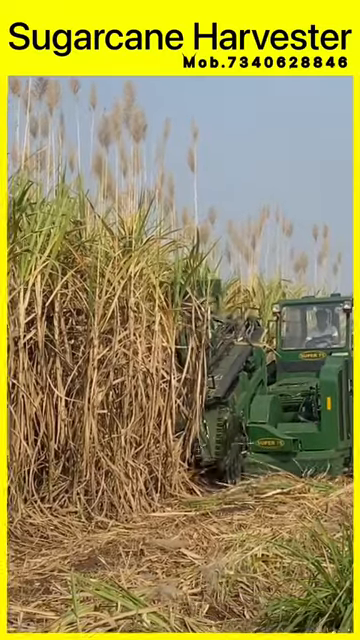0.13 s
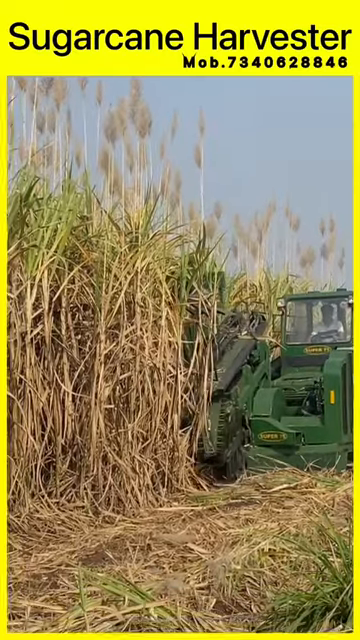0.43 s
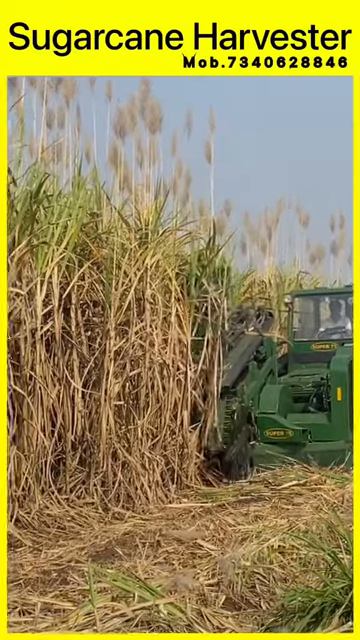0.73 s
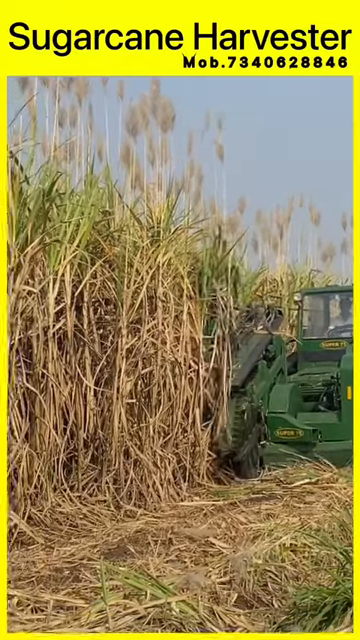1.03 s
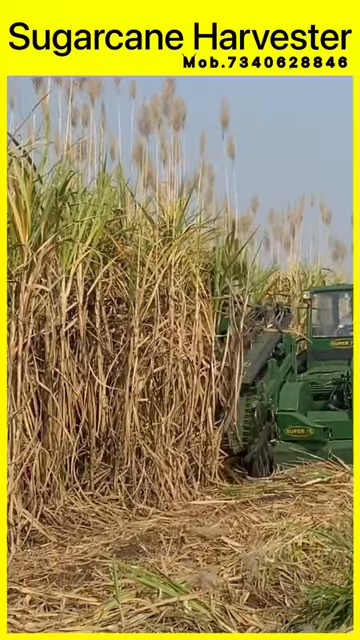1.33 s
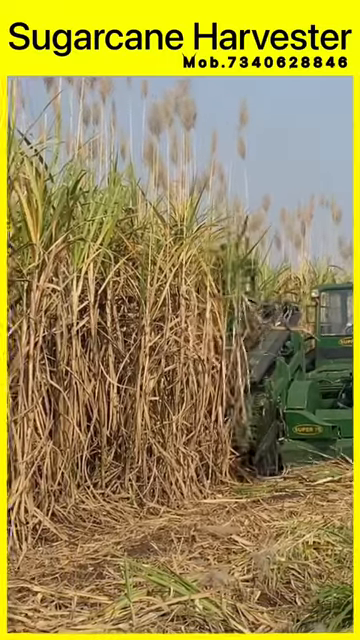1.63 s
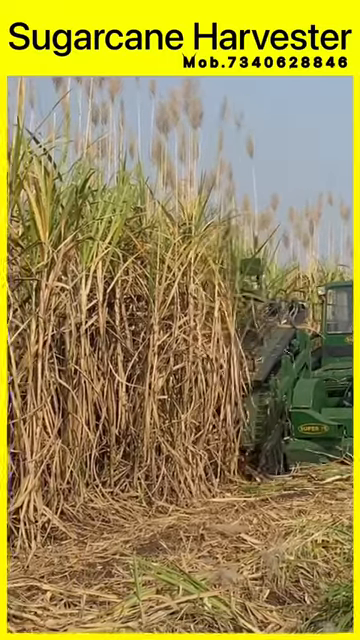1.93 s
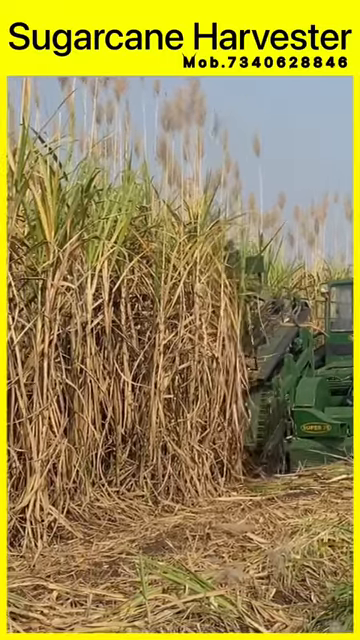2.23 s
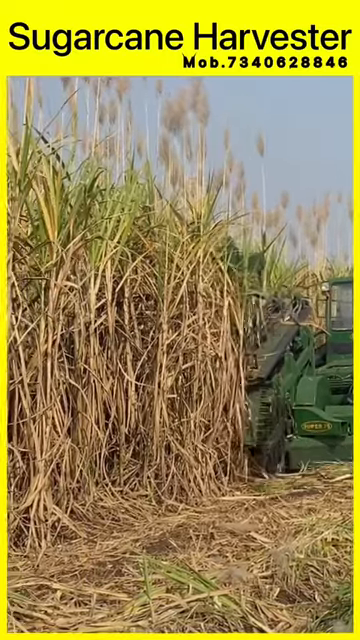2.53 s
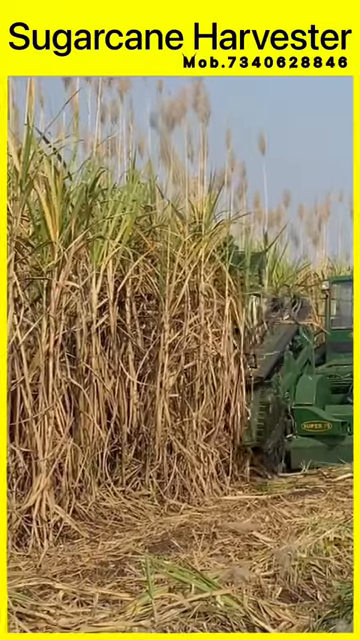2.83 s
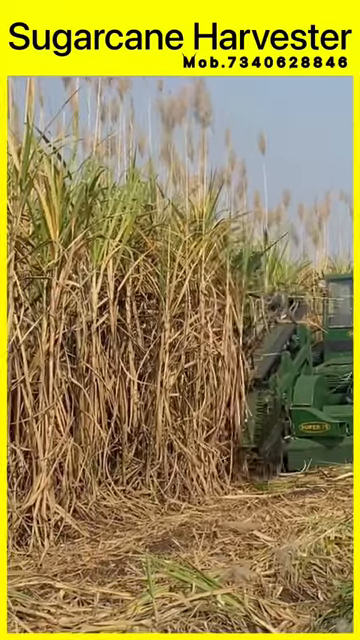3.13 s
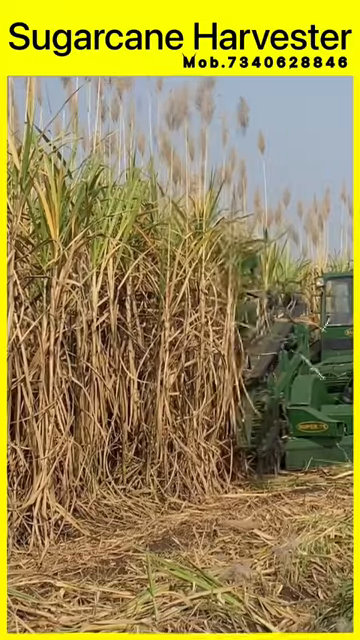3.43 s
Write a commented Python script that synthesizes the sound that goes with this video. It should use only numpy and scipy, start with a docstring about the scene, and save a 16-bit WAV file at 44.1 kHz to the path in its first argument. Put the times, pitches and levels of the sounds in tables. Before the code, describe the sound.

A diesel harvester roars steadily at mid distance while dry cane leaves rustle, crackle and snap.

```python
"""A six-cylinder diesel hums at its firing rate and other orders of its cycle: a crop harvester,
some way off in tall dry cane, heard outdoors through a phone's two microphone ports.
Sine tones make the engine, the hum an octave up and the whining shafts; shaped noise makes the
roar of fans and cutters, its hollow howl, and the low rumble that comes and goes.
Dry leaves and stalks are noise cut into crackles, snaps and ticks; brief tones slide up as squeaks."""
import sys
import numpy as np
from scipy import signal
from scipy.fft import rfft, irfft, next_fast_len
from scipy.io import wavfile
from scipy.ndimage import uniform_filter1d

SR = 44100
rng = np.random.default_rng(int(sys.argv[2]) if len(sys.argv) > 2 else 0)


def bounce(signal):
    """Save signal as a 16-bit WAV file at the path given by the first command-line argument."""
    frames = np.transpose(np.atleast_2d(signal))
    limited = np.clip(frames, -1, 1)
    pcm = np.round(limited * 32767).astype(np.int16)
    wavfile.write(sys.argv[1], SR, pcm)


def volts_from_db(level):
    """Convert decibel levels to linear amplitude ratios."""
    exponent = np.asarray(level, float) / 20
    return 10 ** exponent


N = 157437  # length in samples
STEP, SNAP_SAMPLES, FRAME = 256, 8192, 2048  # samples: control step, longest snap, port filter frame


def evened(x):
    """Scales to rms 1."""
    return x / np.sqrt(np.mean(x ** 2) + 1e-20)


def read(points, hz):
    """Reads a two-column table at the given frequencies, on a log-frequency axis."""
    f, value = np.transpose(points)
    return np.interp(np.log(hz + 1), np.log(f + 1), value)


def curve(rows, axis=1):
    """One column of a time table, drawn as straight lines through every sample."""
    rows = np.array(rows)
    return np.interp(np.arange(N) / SR, rows[:, 0], rows[:, axis])


def slow(top_hz):
    """Slow wander of rms 1: sines from 0.4 Hz to top_hz with random phases, the slower ones larger."""
    t = np.arange(0, N + STEP, STEP) / SR
    rates = np.geomspace(.4, top_hz, num=20)
    x = sum(np.sin(2 * np.pi * (f * t + rng.random())) / np.sqrt(f) for f in rates)
    return np.interp(np.arange(N) / SR, t, evened(x - x.mean()))


def sine(hz, start=0):
    """Sine of rms 1 that follows a frequency curve; start is in turns."""
    return np.sqrt(2) * np.sin(2 * np.pi * (np.cumsum(hz) / SR + start))


def coloured(x, spectrum):
    """Filters by a spectrum table."""
    size = next_fast_len(len(x))
    gain = volts_from_db(read(spectrum, np.fft.rfftfreq(size, 1 / SR)))
    return irfft(rfft(x, size) * gain, size)[:len(x)]


def noise(spectrum, patchy_db, flicker_db, size=512):
    """Noise of rms 1 with drifting patches and a flicker shared by all bands."""
    frames = 4 * N // size + 5
    real, imaginary, patches = rng.standard_normal((frames, size // 2 + 1, 3)).T
    patches = uniform_filter1d(patches, size=6, axis=0)  # across frequency
    patches = evened(uniform_filter1d(patches, size=16, axis=1))  # along time
    flicker = evened(uniform_filter1d(rng.standard_normal(frames), size=8))
    z = (real + 1j * imaginary) * volts_from_db(patchy_db * patches + flicker_db * flicker)
    hiss = signal.istft(z, nperseg=size, noverlap=3 * size // 4)[1][:N]
    return evened(coloured(hiss, spectrum))


# firing tone of the diesel: time_s, firing_hz, level_db
ENGINE_FIRING = [(0, 84.55, -40), (.3, 84.3, -38.5), (.55, 83.67, -34.5), (1.1, 84, -36.5), (1.5, 84, -36),
                 (1.85, 83.67, -33), (2.25, 83.7, -34.5), (2.7, 83.4, -32), (3.1, 83.73, -33.5),
                 (3.35, 84, -38), (3.57, 84.3, -34)]


def firings():
    """Running count of firings: the firing rate summed over time."""
    return np.cumsum(curve(ENGINE_FIRING)) / SR


# other orders of the engine cycle: order (multiple of the cycle rate), level_db, waver_db
CYCLE_ORDERS = [(3, -44, 0), (7, -68, 11), (8, -60.5, -6), (9, -41.5, 0.3), (10, -54, -1), (18, -57, 2.5)]
CYLINDERS, OPPOSED_ORDER = 6, 9


def engine():
    """Orders of the cycle; multiples of half the firing rate stay in step, so firings alternate."""
    out = volts_from_db(curve(ENGINE_FIRING, axis=2)) * np.sin(2 * np.pi * firings())
    for order, db, waver_db in CYCLE_ORDERS:
        turns = order * firings() / CYLINDERS
        turns += rng.random() * (2 * order % CYLINDERS > 0)  # the remaining orders start anywhere
        turns += .5 * (order == OPPOSED_ORDER)
        out = out + volts_from_db(db + waver_db * slow(3.63)) * np.sin(2 * np.pi * turns)
    return np.sqrt(2) * out


# hum about an octave above the firing tone, swelling and fading: time_s, pitch_hz, level_db
HUM_PATH = [(0, 170, -65), (.15, 167.4, -60), (.27, 165.7, -45), (.5, 166.4, -40.5), (.68, 169.3, -45),
            (.8, 165.5, -54), (1.0, 165.9, -44.5), (1.22, 166.7, -39), (1.4, 166, -57),
            (1.65, 166.7, -43.5), (1.95, 167.2, -40), (2.2, 165, -50), (2.42, 166.2, -43),
            (2.65, 167.2, -46.5), (2.9, 166.8, -42), (3.12, 166.3, -49.5), (3.35, 168.3, -42.5),
            (3.57, 168, -53)]


def octave_hum():
    """A clean tone on its own pitch and level curve."""
    return volts_from_db(curve(HUM_PATH, axis=2)) * sine(curve(HUM_PATH))


# shaft and pump tones: pitch_hz, level_db, drift_hz, waver_db
SHAFT_TONES = [(159.7, -53.5, 1.3, 1.5), (187.1, -55.5, 0.39, 1), (210.3, -59, 1.1, 2),
               (266.4, -60.5, 1.02, 2.5), (320.3, -55, 0.83, 1), (358.6, -69, 0.77, 6.5)]


def shafts():
    """Faint sine tones that drift in pitch and level."""
    out = np.zeros(N)
    for hz, db, drift_hz, waver_db in SHAFT_TONES:
        level = volts_from_db(db + waver_db * slow(3.1))
        out += level * sine(hz + drift_hz * slow(1.903), rng.random())
    return out


# colour of the fans, cutters and casing: pitch_hz, density_db (relative, per Hz)
ROAR_COLOUR = [(25, -22), (36, -4), (52, 0), (72, 0), (100, -2), (190, -1.5), (300, -9), (440, -10),
               (600, -6.5), (690, -4), (760, -6.5), (940, -8.5), (1200, -7.5), (1400, -11), (1600, -9.5),
               (1900, -13), (2150, -12), (2320, -17), (2480, -23), (2700, -19), (3600, -21.5), (4600, -28),
               (7000, -30), (15700, -40), (15850, -100)]
# their loudness: time_s, level_db
ROAR_LOUDNESS = [(0, -37), (.3, -37.5), (.7, -37.5), (1.1, -37), (1.35, -38), (1.8, -36.5), (2.3, -37),
                 (2.7, -36), (3.1, -36.5), (3.57, -36)]
ROAR_PATCHY_DB, ROAR_FLICKER_DB, FIRING_THROB = 0.89, 0.15, 0.03  # throb is a share of amplitude


def roar():
    """Broad noise, throbbing slightly with each firing."""
    throb = 1 + FIRING_THROB * np.cos(2 * np.pi * firings())
    return volts_from_db(curve(ROAR_LOUDNESS)) * throb * noise(ROAR_COLOUR, ROAR_PATCHY_DB, ROAR_FLICKER_DB)


HOWL_HZ, HOWL_WANDER_HZ, HOWL_WIDTH_HZ = 693.4, 30.04, 68
HOWL_DB, HOWL_WAVER_DB = -55, 2


def howl():
    """Hollow howl in the roar: noise in a resonance whose centre wanders."""
    centre = np.exp(2j * np.pi * np.cumsum(HOWL_HZ + HOWL_WANDER_HZ * slow(5)) / SR)
    r = np.exp(-np.pi * HOWL_WIDTH_HZ / SR)
    real, imaginary = rng.standard_normal((2, N))
    # narrow noise about 0 Hz, from a doubled pole, is then moved up to the centre
    band = signal.lfilter([1], np.convolve([1, -r], [1, -r]), real + 1j * imaginary)
    return volts_from_db(HOWL_DB + HOWL_WAVER_DB * slow(6)) * evened((centre * band).real)


# colour of the dry leaves: pitch_hz, density_db (relative, per Hz)
LEAF_COLOUR = [(600, -28), (1500, -10), (2150, 3), (2480, -4), (2750, -0.5), (3600, 1.5), (4600, -4),
               (6200, 0), (8000, -5.5), (11000, -5), (13000, -7), (15000, -12), (15700, -20), (15850, -70)]
# loudness of the leaves: time_s, level_db
LEAF_LOUDNESS = [(0, -49), (.22, -54), (.48, -50.5), (.58, -51), (.85, -50.5), (1.1, -52), (1.23, -53.5),
                 (1.4, -52.5), (1.55, -54.5), (1.9, -53.5), (2.2, -49.5), (2.45, -46), (2.55, -49),
                 (2.7, -46), (2.82, -45.5), (3, -43.5), (3.2, -45.5), (3.4, -42), (3.57, -47)]
LEAF_PATCHY_DB, LEAF_FLICKER_DB = 2, 1.5
CRACKLES_PER_S, CRACKLE_S, CRACKLE_SPREAD_DB = 370, 0.001, 5.5
CRACKLE_DB, CLUMP_DB = -9, -1.5  # crackle against the rustle; depth of the clumps


def leaves():
    """Rustling noise with clumps of short crackles of uneven size."""
    struck = rng.random(N) < CRACKLES_PER_S / SR
    size = struck * volts_from_db(CRACKLE_SPREAD_DB * np.minimum(rng.exponential(1, N), 5))
    t = np.arange(STEP) / SR
    bursts = signal.oaconvolve(size * volts_from_db(CLUMP_DB * slow(18)), t * np.exp(-t / CRACKLE_S))[:N]
    crackle = evened(coloured(bursts * rng.standard_normal(N), LEAF_COLOUR))
    rustle = noise(LEAF_COLOUR, LEAF_PATCHY_DB, LEAF_FLICKER_DB, size=256)
    return volts_from_db(curve(LEAF_LOUDNESS)) * evened(rustle + volts_from_db(CRACKLE_DB) * crackle)


def cracks(rows, shape, grainy_db):
    """One burst of leaf-coloured noise per row, duller or brighter, broken into grains."""
    out = np.zeros(N + SNAP_SAMPLES)
    for start_s, db, tilt_db in rows:
        grain, lumps = rng.standard_normal((2, SNAP_SAMPLES))
        colour = [(hz, level_db + tilt_db * np.log2(hz / 6000)) for hz, level_db in LEAF_COLOUR]
        lumps = evened(uniform_filter1d(lumps, size=90))
        lumps = evened(volts_from_db(grainy_db * lumps))
        at = round(start_s * SR)
        out[at:at + SNAP_SAMPLES] += volts_from_db(db) * shape * lumps * evened(coloured(grain, colour))
    return out[:N]


# stalks snapping: start_s, level_db (before SNAP_DB), brightness_db_per_octave
STALK_SNAPS = [(0.0758, -41, 10), (0.3026, -36, -3), (0.455, -38, 0), (0.4894, -37.5, 3), (0.637, -36, -10),
               (0.675, -40, 3), (0.8875, -45, 3), (1.0074, -38, 2), (1.085, -39, 10), (1.2864, -35, -1),
               (2.1186, -33, -5), (2.4556, -39, 0.1), (2.6463, -32, -5.5), (2.6834, -35.5, 1),
               (2.8968, -28, -4.5), (2.9241, -33, -12), (2.9816, -27.5, -7.5), (3.0694, -29, -13),
               (3.1251, -31, -3), (3.2524, -33, 1), (3.2819, -35, 3), (3.4117, -32.5, -11),
               (3.4394, -34, -1), (3.5543, -30, -3)]
# sharp dry ticks: start_s, level_db (before TICK_DB), brightness_db_per_octave
DRY_TICKS = [(0.0777, -42, 5), (0.4703, -39, 5), (0.6769, -42, 5), (0.8819, -41, 3), (1.0011, -38, 5),
             (1.0705, -38, 10), (1.0879, -39, 2), (1.0921, -28, 9), (1.1125, -36, 11), (1.1265, -34, 5),
             (2.3376, -41, 5), (2.4568, -41, 5), (2.6838, -44, 5), (2.9075, -36, -1), (2.9896, -28, 8),
             (3.2465, -44, 5), (3.259, -45, 3), (3.2824, -33, 5), (3.4116, -38, 5)]
SNAP_RISE_S, SNAP_T60_S, SNAP_DB, SNAP_GRAINY_DB = 0.0066, 0.036, -5, 2.5
SPLINTER_T60_S, SPLINTER_DB = 0.17, -5.5  # level against the crunch
TICK_T60_S, TICK_DB = 0.0059, -1.5


def snaps():
    """Stalks crunch with a soft rise and a splintering tail; ticks are sharp and short."""
    t = np.arange(SNAP_SAMPLES) / SR
    crunch = np.exp(-np.log(1000) * t / SNAP_T60_S)  # falls 60 dB in the T60
    splinter = volts_from_db(SPLINTER_DB) * np.exp(-np.log(1000) * t / SPLINTER_T60_S)
    snap = np.minimum(t / SNAP_RISE_S, 1) * (crunch + splinter)
    tick = np.exp(-np.log(1000) * t / TICK_T60_S)
    stalks = volts_from_db(SNAP_DB) * cracks(STALK_SNAPS, snap, SNAP_GRAINY_DB)
    return stalks + volts_from_db(TICK_DB) * cracks(DRY_TICKS, tick, 0)


# squeaks sliding up: start_s, length_s, from_hz, to_hz, level_db, overtone_db (the octave)
SQUEAK_SLIDES = [(.637, .022, 1560, 1850, -45, -5), (2.913, 0.068, 651, 1010, -39.8, -12),
                 (3.1, 0.049, 622, 800, -46, -15)]
SQUEAK_ROUGH = .15  # rms share of amplitude


def squeaks():
    """Brief rough tones, each with its octave, that slide upward."""
    out = np.zeros(N)
    for start_s, length_s, from_hz, to_hz, db, overtone_db in SQUEAK_SLIDES:
        u = np.arange(0, 1, 1 / (length_s * SR))  # progress through the squeak
        wobble = evened(uniform_filter1d(rng.standard_normal(STEP * 20), size=150))
        rough = 1 + SQUEAK_ROUGH * wobble[:len(u)]
        angle = 2 * np.pi * np.cumsum(from_hz + (to_hz - from_hz) * u) / SR
        tone = np.sin(angle) + volts_from_db(overtone_db) * np.sin(2 * angle)
        swell = np.sqrt(2 * np.sin(np.pi * u))
        out[round(start_s * SR):][:len(u)] += volts_from_db(db) * swell * rough * tone
    return out


# colour of the low rumble: pitch_hz, density_db (relative, per Hz)
RUMBLE_COLOUR = [(20, -58), (35, -21), (50, 0), (65, -2), (78, -3), (110, -33), (200, -120)]
# its loudness: time_s, level_db
RUMBLE_LOUDNESS = [(0, -58), (.5, -50), (.9, -45), (1.4, -50), (1.65, -42), (2.05, -43), (2.17, -61),
                   (2.7, -54), (2.95, -44), (3.2, -53), (3.57, -49)]


def rumble():
    """Low lumpy noise that comes and goes."""
    return volts_from_db(curve(RUMBLE_LOUDNESS)) * evened(coloured(rng.standard_normal(N), RUMBLE_COLOUR))


def scene():
    """The sum of all sources, the same in both channels."""
    machine = engine() + octave_hum() + shafts() + roar() + howl()
    mix = machine + leaves() + snaps() + squeaks() + rumble()
    return np.array([mix, mix])


def roll_off(x):
    """The treble ends steeply here."""
    return signal.sosfilt(signal.butter(12, 16900, fs=SR, output="sos"), x)


# balance of the two microphone ports: pitch_hz, left_minus_right_db
PORT_BALANCE = [(60, 1.5), (110, -2.5), (200, -1), (380, -2), (700, -2.0), (1290, -3.0), (2380, -1.5),
                (4400, 0.5), (8120, -0.5), (15000, 0.5)]
# how alike the ports hear: pitch_hz, likeness (1 is the same signal)
PORT_LIKENESS = [(30, 0.85), (100, 0.97), (1000, 0.98), (5000, 0.98), (8000, 1), (15000, .993)]
PORT_DELAY_S, WIDE_FROM_HZ, IN_STEP_HZ = .000232, 7500, 6850  # delay acts above WIDE_FROM_HZ


def record(dry):
    """Two microphone ports: slightly unlike and unevenly loud, with a small delay in the treble."""
    hz, _, z = signal.stft(dry, SR, nperseg=FRAME)
    phase = np.where(hz > WIDE_FROM_HZ, -2 * np.pi * (hz - IN_STEP_HZ) * PORT_DELAY_S, 0)[:, None]
    same = np.clip(read(PORT_LIKENESS, hz), 0, 1)[:, None]
    scatter = np.exp(2j * np.pi * rng.random(z[0].shape))
    apart = np.sqrt((1 - same) / (1 + same)) * abs(z[0]) * scatter
    # each port takes half of the balance and half of the phase
    port = volts_from_db(read(PORT_BALANCE, hz) / 2)[:, None] * np.exp(.5j * phase)
    ports = np.array([(z[0] + apart) * port, (z[1] - apart) / port])
    mix = signal.istft(ports, SR, nperseg=FRAME)[1][:, :N]
    return roll_off(mix)


dry = scene()
out = record(dry)
bounce(out)
```